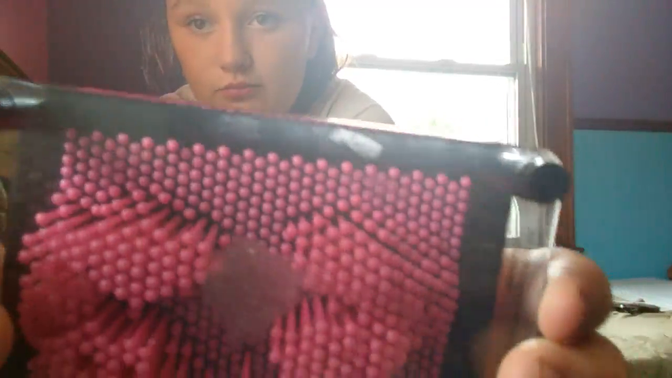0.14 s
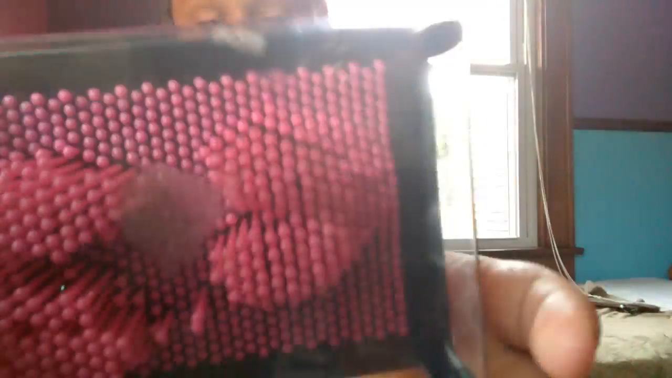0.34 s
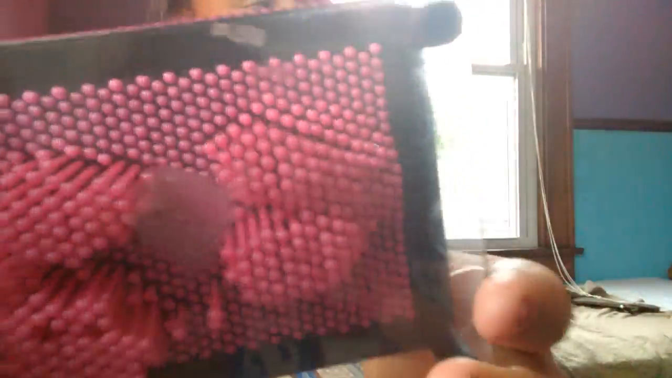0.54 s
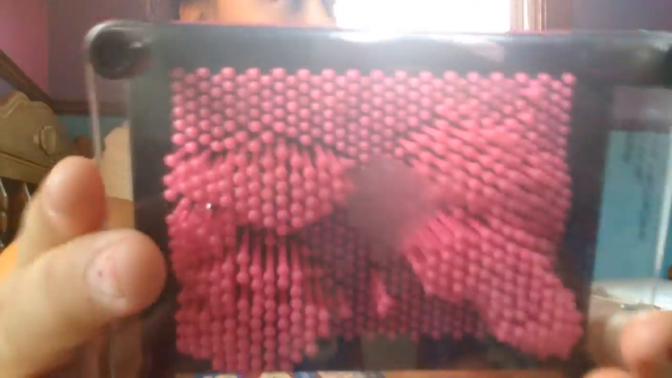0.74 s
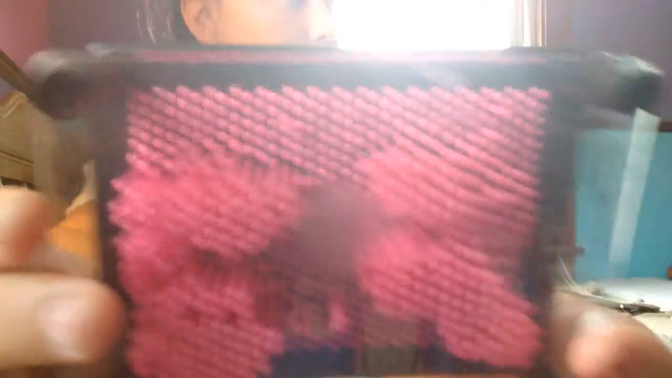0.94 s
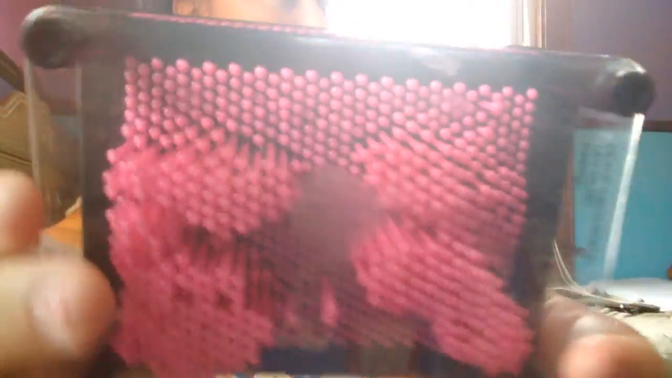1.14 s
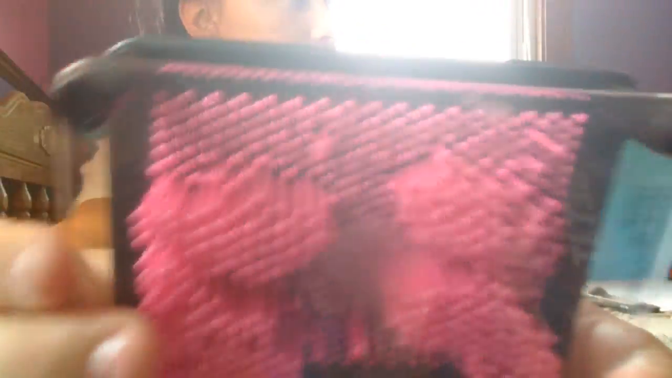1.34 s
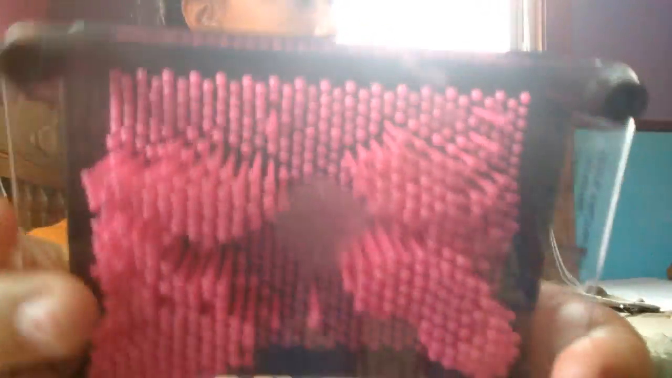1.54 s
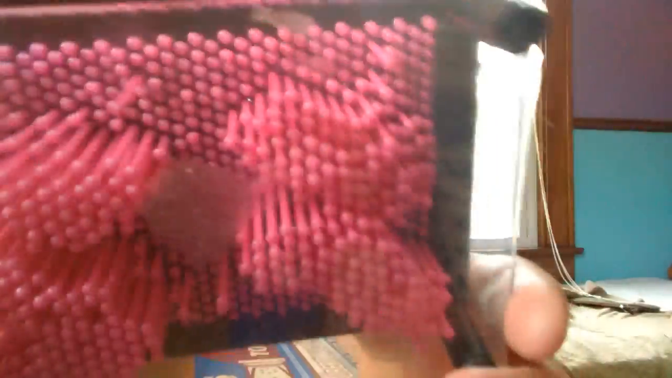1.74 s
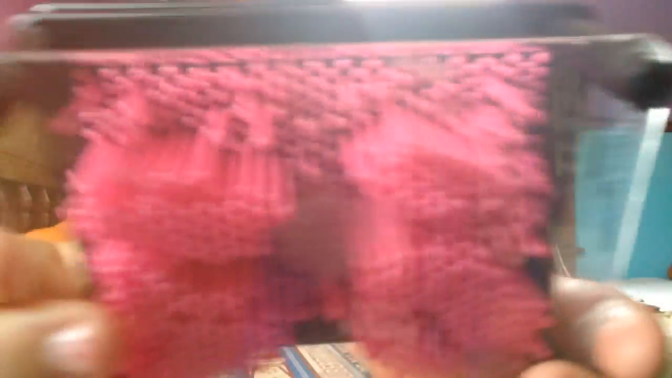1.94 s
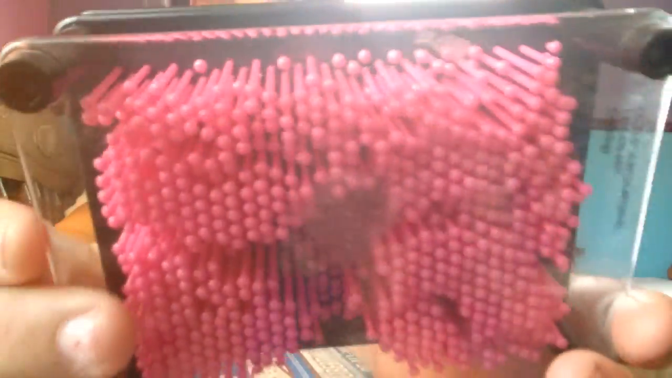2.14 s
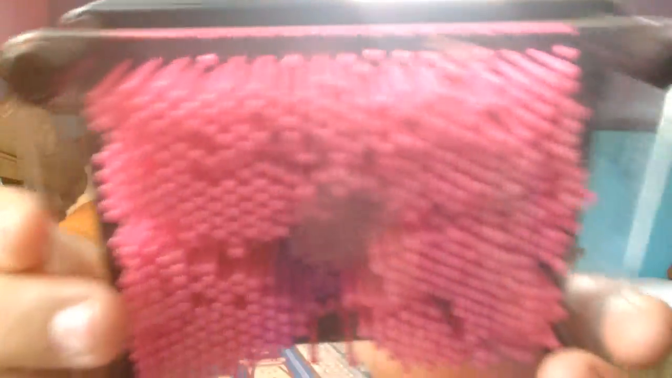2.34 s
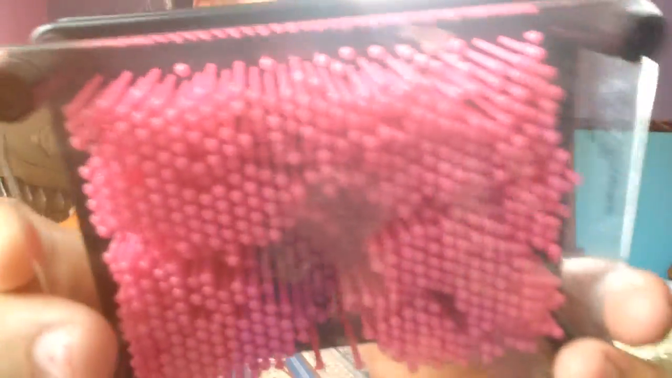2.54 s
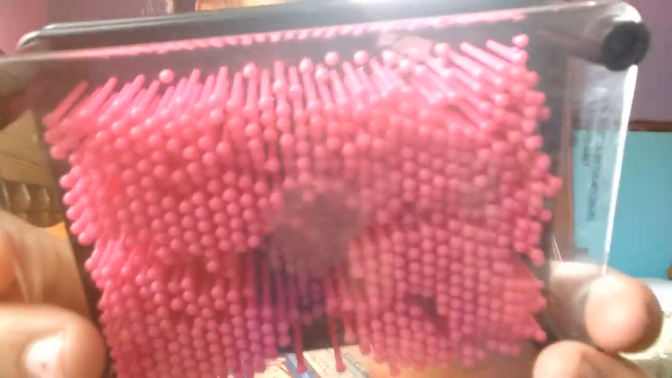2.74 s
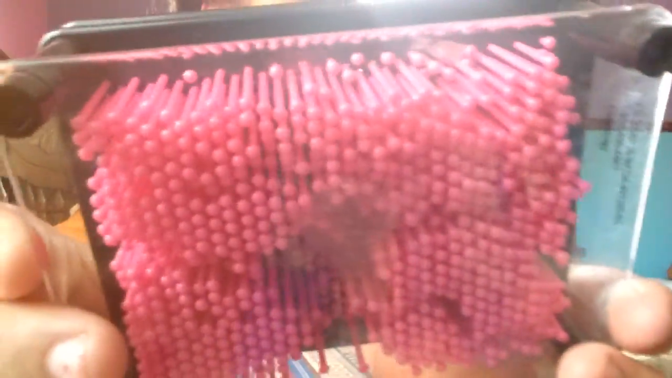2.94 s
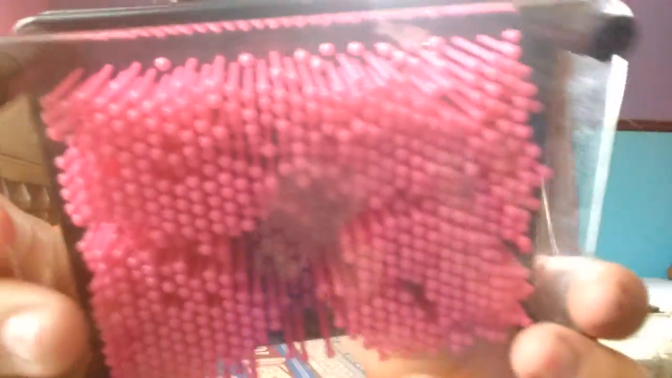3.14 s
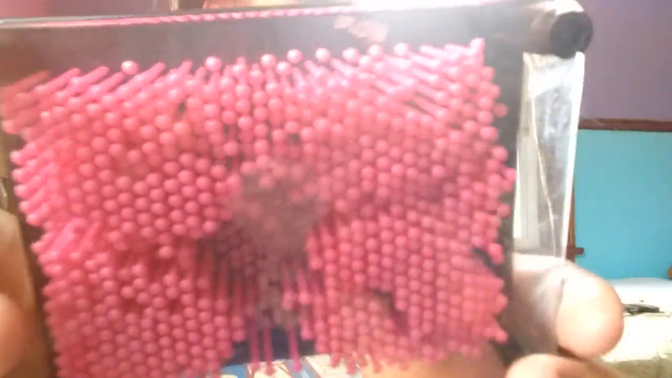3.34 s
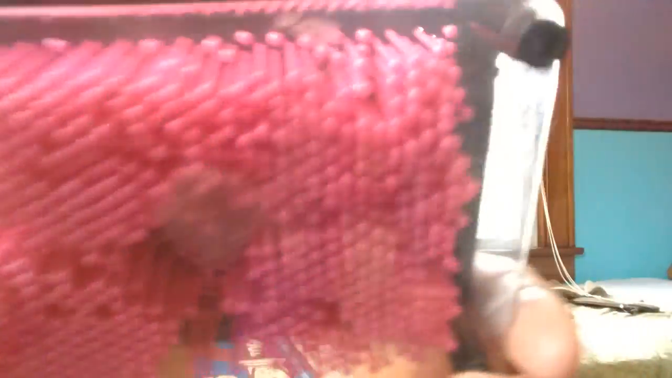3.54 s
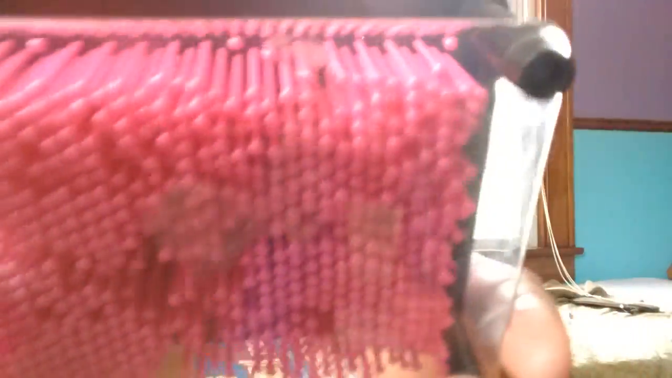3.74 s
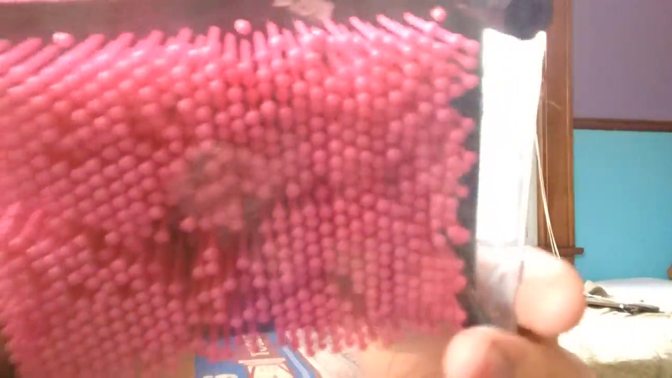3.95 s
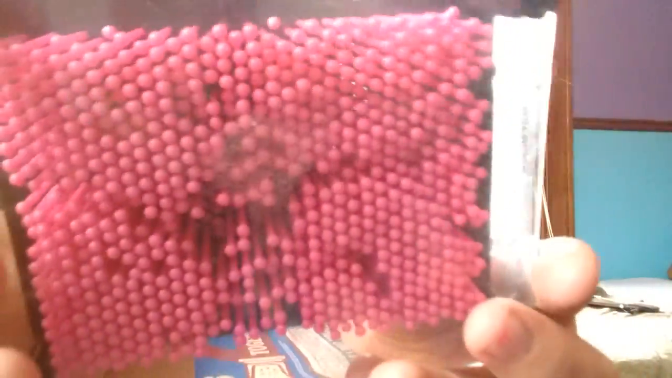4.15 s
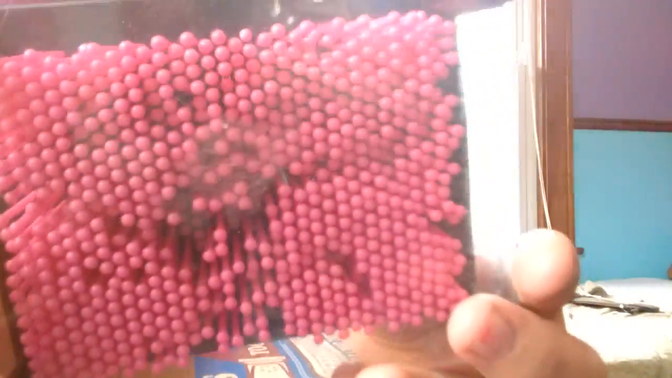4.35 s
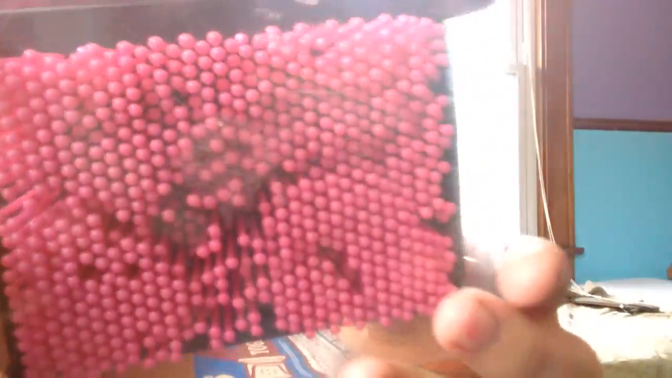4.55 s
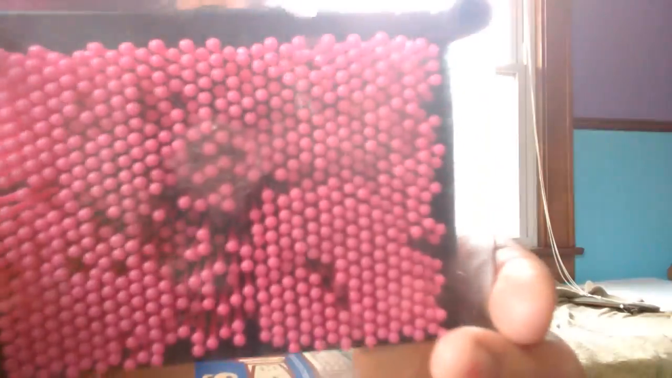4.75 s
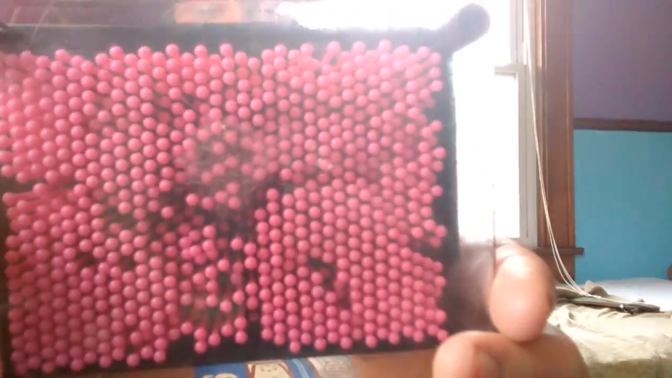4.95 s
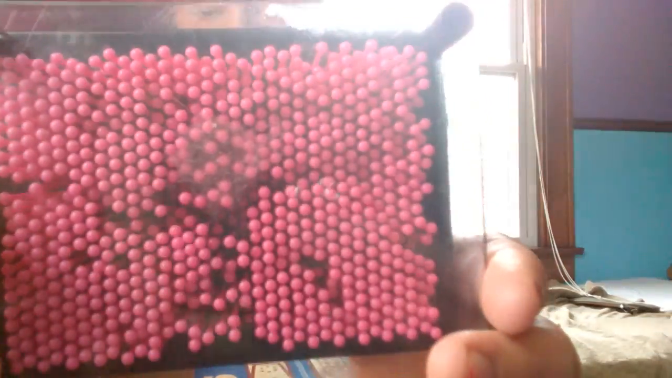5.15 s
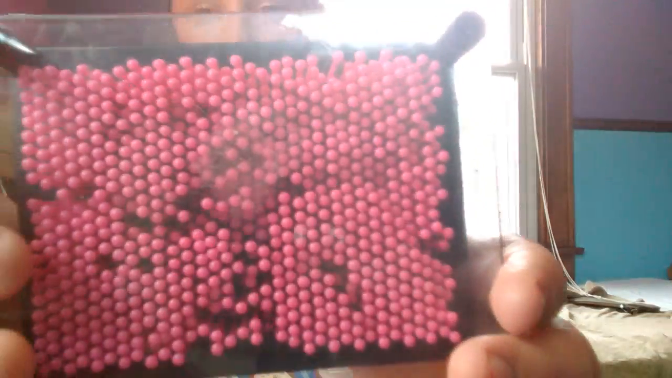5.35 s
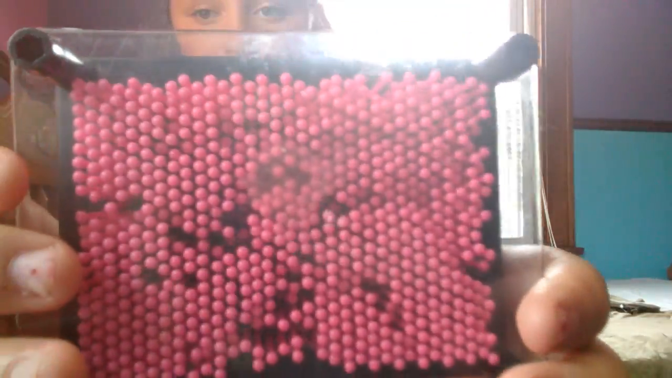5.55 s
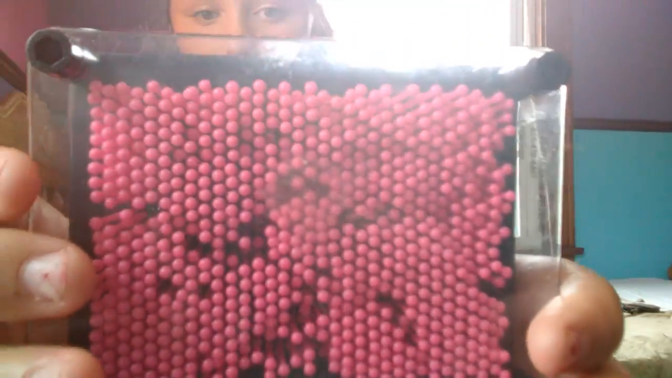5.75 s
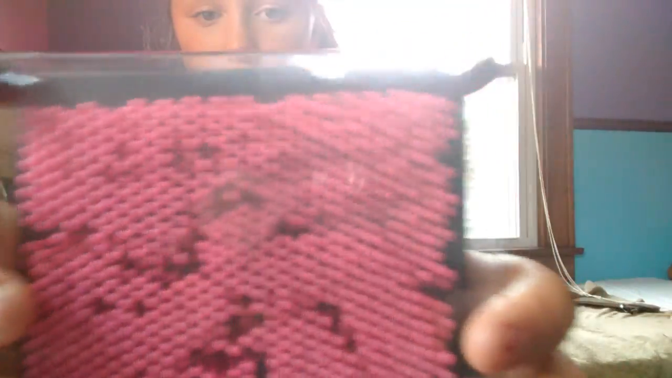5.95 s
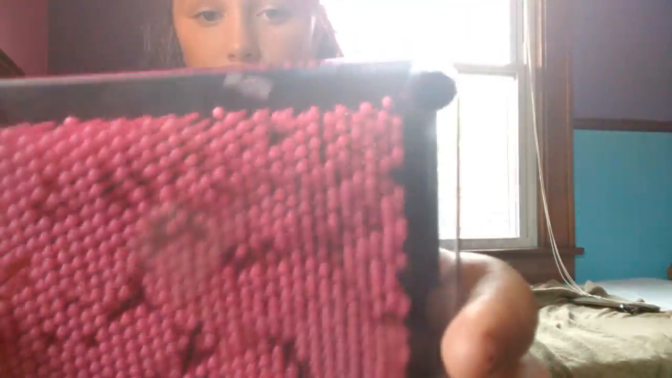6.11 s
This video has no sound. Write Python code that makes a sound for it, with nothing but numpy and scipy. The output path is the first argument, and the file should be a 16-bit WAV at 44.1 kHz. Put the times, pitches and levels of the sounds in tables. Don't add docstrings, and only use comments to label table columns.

```python
import sys
import numpy as np
from scipy import signal
from scipy.fft import rfft, irfft
from scipy.io import wavfile

SR = 44100
rng = np.random.default_rng(int(sys.argv[2]) if len(sys.argv) > 2 else 0)


def gain_from_db(level_db):
    decades = np.asarray(level_db, float) / 20
    return 10 ** decades


def persist_wave(psi):
    counts = np.round(np.clip(psi, -1, 1) * 32767).astype(np.int16)
    wavfile.write(sys.argv[1], SR, np.atleast_2d(counts).T)


N = 272538

# [t/s, tick level/dB, plate knock re tick/dB, length/ms]
CLUMPS = [(0.0107, -42, -20.5, 0.99), (1.669, -24, -14.5, 0.42), (1.857, -31.5, -9, 1.6),
          (1.902, -26, -10, 1.24), (2.381, -29, -6.5, 1.4), (2.4207, -19.5, -9.5, 1.7),
          (3.7715, -13.5, -14, 1.2), (4.219, -35, -11.5, 2), (4.2257, -33, -17.5, 0.79),
          (4.2374, -39.5, -17, 2.0), (4.243, -37.5, -18.5, 2.6), (5.1927, -44, -5, 4.3),
          (5.536, -34, -7, 3.5), (5.5507, -34.5, -11, 2.5), (5.7908, -38, -13, 2)]
# [t/s, tick level/dB, plate knock re tick/dB]
SINGLE_PINS = [(0.047, -12.5, -12.5), (1.0, -34.5, -4.5), (1.4322, -37.5, -9), (1.8986, -24.5, -13),
               (1.9269, -23, -14), (1.945, -10.5, -14), (1.9896, -9.5, -7.5), (2.414, -24, -8),
               (2.468, -10.5, -12), (2.8606, -19.5, -11.5), (2.892, -21.5, -9), (2.9179, -26, -9.5),
               (3.201, -32, -8.5), (3.2716, -33, -9.5), (3.747, -21, -9), (3.9329, -12, -8.5),
               (3.9518, -18, -7), (5.5738, -42, -8), (5.702, -38, -11)]
# [t/s, tick level/dB, plate knock re tick/dB]
JERK_LANDINGS = [(0.0649, -7.5, -10.5), (0.0673, -26.0, -6.5), (0.072, -10.5, -11.0), (0.0754, -0.5, -16),
                 (0.083, -2.5, -14), (0.092, -23.5, -12.5), (0.0957, -16.5, -16.5), (0.0987, -18.5, -13.5),
                 (0.103, -19.5, -17.5), (0.702, -11.5, -5), (0.7057, -0.5, -14.5), (0.7078, -0.5, -13.5),
                 (0.7108, -12.5, -8.5), (0.7143, -17, -17), (0.7159, -20.5, -17), (0.7188, -13.0, -17.0),
                 (0.7237, -16.5, -18), (0.728, -13.5, -16.5), (0.731, -17.5, -15.5), (0.7361, -21.0, -13.5),
                 (0.7398, -19.0, -13), (0.7438, -17.5, -10.5), (0.7463, -22.5, -11), (0.7522, -22, -14.5),
                 (0.7551, -24, -16.5), (0.7618, -22, -14), (0.7633, -26.5, -21.5), (0.7691, -24, -12),
                 (0.7718, -22, -23.5), (0.775, -30, -13.0), (1.4631, -19, -14.5), (1.465, -11.5, -9.5),
                 (1.469, -8.5, -17.5), (1.472, -17, -14.5), (1.475, -15, -11)]
# [t/s, tick level/dB, plate knock re tick/dB]
TIPPING_LANDINGS = [(1.9907, -9.5, -12), (1.9935, -5.5, -5), (1.9966, -1.5, -12.0), (2.002, -3.5, -11.5),
                    (2.0048, -15.5, -10), (2.007, -11.5, -11.5), (2.011, -12.0, -9), (2.0126, -8.0, -12.5),
                    (2.0172, -6, -15), (2.0206, -15.5, -11.5), (2.023, -13, -14.5), (2.0262, -15.5, -11),
                    (2.0283, -18, -16.5), (2.034, -28.5, -8.5), (2.0356, -5.5, -11), (2.0413, -2.0, -14.5),
                    (2.0451, -4, -16.0), (2.0485, -11, -12), (2.0546, -7.5, -13.0), (2.0563, -15, -16.5),
                    (2.063, -18.0, -15.0), (2.066, -8.5, -14.5), (2.0725, -6.5, -11),
                    (2.0818, -13.5, -12.5), (2.085, -12.5, -15), (2.094, -25.5, -16.5),
                    (2.0978, -27, -14.5), (2.101, -32.5, -9), (2.1045, -16.5, -13.0), (2.1086, -18.0, -6.5),
                    (2.1117, -7, -10), (2.1165, -22.0, -13), (2.1252, -5, -18), (2.13, -5.5, -17),
                    (2.1342, -2, -14), (2.1373, -5.5, -10.5), (2.1425, -4, -11), (2.1448, -7.5, -16),
                    (2.1481, -6.5, -12), (2.1514, -18.0, -10.5), (2.1557, -9.5, -10.5), (2.1612, -5, -8.5),
                    (2.1645, -14.5, -13), (2.1706, -14.5, -9), (2.176, -14, -10.5), (2.1794, -20.0, -14.5),
                    (2.1811, -19.5, -6), (2.1845, -19.5, -7.5)]
# [t/s, tick level/dB, plate knock re tick/dB]
SHAKE_LANDINGS = [(3.7813, -30, -21), (3.7842, -10.5, -10.5), (3.7866, -38, -27), (3.789, -23.0, -1),
                  (3.7929, -36, -16), (3.7955, -33, -8), (3.7975, -8.5, -14), (3.802, -12, -10.5),
                  (3.806, -25.5, -11.0), (3.807, -25.5, -11.5), (3.8124, -4.5, -15.5), (3.816, -24.5, -13),
                  (3.8175, -37, -6), (3.8225, -7, -12), (3.8275, -11, -9), (3.8318, -5, -15),
                  (3.8361, -5.5, -9), (3.837, -17, -6.5), (3.8417, -8, -12.5), (3.8453, -9.5, -9),
                  (3.8512, -11.5, -8), (3.8574, -7, -13), (3.8627, -21.0, -12), (3.8649, -14, -5.5),
                  (3.8714, -21, -19), (3.8746, -22.0, -16), (3.878, -31, -15), (3.8806, -30, -3.5),
                  (3.8838, -14, -7.5), (3.888, -19.5, -7), (3.8928, -12.5, -13.5), (3.8967, -27.0, -12.0),
                  (6.041, -39, -9.0), (6.0435, -12.5, -12), (6.0475, -13, -11.5), (6.0508, -8.5, -13.5),
                  (6.0526, -15, -15), (6.058, -30, -17), (6.061, -28, -25), (6.0649, -25, -27),
                  (6.0694, -25, -25), (6.072, -28, -23), (4.137, -30, -7), (4.14, -22, -4),
                  (4.142, -15, -9), (4.1449, -17.5, -10.5), (4.1494, -15, -12.5), (4.1515, -18.5, -14.5),
                  (4.1546, -22, -8)]
# [t/s, tick level/dB]
PIN_TAPS = [(0.193, -37), (0.2552, -40), (0.2753, -48), (0.326, -43), (.4244, -48), (0.4397, -49),
            (.524, -36), (0.8758, -42), (1.25, -49.5), (1.2972, -50), (1.412, -41.5), (1.642, -35),
            (1.6896, -33), (2.1963, -19), (2.5479, -37), (2.5818, -39.5), (2.804, -51.5), (3.3402, -44.5),
            (3.3617, -49), (3.3827, -49), (3.462, -52.5), (3.5428, -54.5), (4.4819, -53.5), (4.5587, -32),
            (4.7626, -48), (4.8684, -47), (5.7093, -35), (5.8, -35), (5.9566, -45), (6.106, -30.5)]
# [t/s, knock level/dB, brightness/(dB/octave)]
FRAME_CREAKS = [(.2887, -43, -4.5), (.339, -50, -3), (.3617, -52, -8.5), (.367, -47, -4), (.375, -57, -5),
                (0.462, -60, -9), (0.495, -53, -9), (0.515, -47.5, -7), (0.588, -43, -6), (.666, -53, -0.1),
                (1.394, -58, -8), (1.6072, -44, -1), (1.636, -41, 3), (1.648, -45, 0), (1.664, -50, 12),
                (2.2878, -37, 0), (2.3093, -37.5, 1.5), (2.3306, -32.5, -3), (2.4635, -26.5, -1.3),
                (3.66, -53.5, 3.5), (3.687, -54.5, -0.5), (3.694, -39.5, 3), (3.7034, -43, 9),
                (3.711, -41, 4), (3.9229, -22, 0.5), (4.0453, -33, 0.5), (4.204, -32.5, -2),
                (4.2605, -43, -2), (4.2667, -49, -1.5), (5.188, -49, -2.5), (5.268, -59.5, 3),
                (5.289, -62.5, 3.5), (5.317, -63, 1.5), (5.4868, -56.5, 2.5), (5.597, -55, -2.5),
                (5.6147, -47, -1), (5.638, -49, 4), (6.178, -45.5, 1.5)]
# [start t/s, length/s, first tick/dB, last tick/dB, plate knock re tick/dB]
PIN_CASCADES = [(0.107, 0.2, -37.5, -49.5, -10.5), (0.779, 0.081, -36, -50.5, -10),
                (1.475, 0.09, -29, -42, -12), (3.21, 0.043, -54, -71.5, -23), (4.158, 0.052, -46, -47, -17),
                (4.57, 0.017, -40, -46, -20), (4.698, 0.027, -57, -60, -25),
                (5.196, 0.099, -61.5, -71.5, -9.5), (5.553, 0.039, -48, -70, 0),
                (5.734, 0.017, -52, -58, -11), (5.783, 0.052, -44, -55, -21.5),
                (6.003, 0.042, -54, -57, -30), (6.074, 0.11, -30, -50, -17)]
# [t/s, peak level/dB]
TIP_BRUSHES = [(0.196, -45), (0.2523, -51), (0.275, -57), (0.297, -65), (0.3252, -58), (0.3324, -58),
               (0.424, -69), (0.4404, -69), (0.4818, -68), (0.4983, -66), (0.5237, -54), (0.5764, -56),
               (0.668, -45), (1.6834, -55), (1.6964, -59), (4.2194, -49.5), (4.2413, -49), (4.7142, -74),
               (4.7394, -63.5), (5.5069, -69), (5.6936, -60), (5.7284, -60), (5.7438, -64), (5.7983, -49),
               (5.824, -51), (6.0082, -57)]
# [t/s, peak level/dB, rise/s, fall/s, each for 20 dB]
BOARD_STIRS = [(.01, -44.5, .05, 0.17), (.12, -33.5, 0.061, 0.097), (.28, -51, 0.052, 0.06),
               (0.331, -67, .02, 0.085), (0.441, -57.5, .03, 0.033), (0.521, -50, 0.062, 0.035),
               (0.589, -56, .02, 0.012), (0.665, -37.5, 0.027, 0.11), (.695, -46.5, .03, 0.22),
               (1.27, -77.5, .08, 0.063), (1.581, -47.5, 0.11, 0.17), (1.67, -46, 0.054, 0.055),
               (1.92, -50, 0.07, 0.11), (2.07, -34.5, 0.12, 0.18), (2.44, -57, .1, 0.1),
               (2.9, -68.5, .04, 0.089), (3.35, -75.5, .15, .15), (3.719, -62.5, 0.05, 0.095),
               (3.85, -44.5, 0.095, 0.17), (4.131, -64, .03, 0.063), (4.23, -66.5, 0.057, 0.046),
               (4.56, -58.5, .04, 0.09), (4.719, -67.5, .05, 0.066), (4.87, -73, 0.023, .04),
               (5.2, -63, .01, 0.11), (5.468, -69, 0.1, 0.049), (5.56, -52, 0.037, 0.1),
               (5.741, -75, 0.052, 0.042), (5.81, -64, .03, 0.056), (5.969, -58.5, 0.046, 0.17)]
# [t/s, grip effort/dB, finger place/(dB/octave)]
HAND_GRIP = [(0.0, -65.5, -10), (.35, -66.5, 5), (.7, -72.5, 2), (1.05, -91.5, -3), (1.45, -91, 3),
             (1.65, -63.5, -11), (1.85, -81.5, -4), (2.1, -70, -3), (2.55, -73.5, -6), (2.8, -79.5, 4.5),
             (3.72, -80, -1.5), (3.9, -71, 3), (4.22, -75.5, -2), (5.15, -88, -4), (5.35, -76, 3),
             (5.75, -73, 4.5), (5.9, -81.5, 7), (6.18, -63, 5)]
# [f/Hz, level/dB, t60/s]
PLATE_MODES = [(372, -19.5, 0.0087), (726, -15.5, .012), (1063.3, -10.5, 0.0041), (1710.5, -9, .008),
               (2190, -4.5, 0.0052), (2830, -1.5, 0.0033), (3773, -5.5, 0.0043), (4550, -4.5, 0.0026),
               (5960, -2, 0.0014)]
# [f/Hz, level/dB, t60/s]
SHAFT_MODES = [(5600, -33, .012), (11000, -21, .013), (14300, -22, .005)]
# [f/Hz, level/dB, t60/s]
FRAME_MODES = [(1150, -14, .016), (1660, 0, .022), (1850, -4, .016), (2950, -1, .016), (3150, -5, .02)]
# [f/Hz, level/dB, t60/s]
RUB_MODES = [(352, -2.5, .011), (570, -3, .012), (830, -9, .008), (1250, -14, .005), (1760, -17, .004)]
# [f/Hz, level/dB, t60/s]
LOOSE_RUB_MODES = [(543, 2, 0.031), (1500, -13, .015)]
# [level/dB, start f/Hz, t60/s]
DESK_THUMP = (-33, 220, .1)
# [delay t/s, level/dB]
NEAR_ECHOES = [(.0019, -2), (.0038, -16), (.0092, -21), (0.0153, -16.5), (0.022, -19.5)]
# [f/Hz, t60/s]
ROOM_DECAY = [(150, 0.36), (500, 0.26), (1500, 0.41), (4000, 0.16), (8000, 0.24), (14000, 0.25)]
# [f/Hz, level/(dB per Hz)]
RUMBLE_SPECTRUM = [(30, -13.5), (60, -1), (120, 3), (250, -4), (500, -18.5), (1000, -31.5), (2000, -52.5)]
# [f/Hz, level/(dB per Hz)]
HISS_SPECTRUM = [(30, -3.5), (120, 3.5), (600, -7.5), (1400, -9.5), (4400, -22), (9000, -34.5),
                 (15000, -31.5)]
# [f/Hz, width/Hz, level/dB]
PORT_RESONANCES = [(7460, 1600, 15.5), (8197, 556, 34.5), (8260, 460, 17.5), (11300, 47, 3)]

LANDING_MS = 1.6
GRIP_EASES_S = 5.1


def clock():
    return np.arange(N) / SR


def at_hz(points, hz):
    table_hz, values = np.transpose(points)
    return np.interp(np.log(hz), np.log(table_hz), values)


def rms_one(x):
    return x / np.sqrt(np.mean(x ** 2) + 1e-20)


def held_noise(length):
    return np.repeat(rng.standard_normal(N // length + 1), length)[:N]


def train(times_s, sizes):
    at = np.clip((times_s * SR).astype(int), 0, N - 1)
    return np.bincount(at.ravel(), sizes.ravel(), N)


def ring(clicks, hz, t60):
    r, w = gain_from_db(-60 / (t60 * SR)), 2 * np.pi * hz / SR
    return signal.lfilter([0, np.sin(w)], [1, -2 * r * np.cos(w), r * r], clicks + 1e-18)


def ring_modes(clicks, modes):
    return sum(gain_from_db(db) * ring(clicks, hz, t60) for hz, db, t60 in modes)


def tick(clicks, cut_hz, soft_hz):
    sos = signal.butter(2, [cut_hz, soft_hz], "band", fs=SR, output="sos")
    return signal.sosfilt(sos, clicks + 1e-18)


def strikes(heads_per_ms, tick_db, knock_db, scatter_db, count):
    s, level_db, plate_db, length_ms, tilt_db = np.transpose(contacts())[:, :, None]
    order, chance = np.arange(count), rng.random((len(s), count))
    times = s + (order + (order > 0) * (chance - .5)) / heads_per_ms / 1000
    landed = np.clip(0.71 + length_ms * heads_per_ms - order, order == 0, 1)
    crowded = length_ms == LANDING_MS
    landed = landed * np.where(crowded & (order == 0), 0.79, 1)
    sizes = landed * gain_from_db(level_db + rng.normal(0, 1, times.shape)) * rng.choice([-1, 1], times.shape)

    hard = np.clip((level_db + 62) / 82, .15, 1) * np.clip(-plate_db / 4.6, .2, 1)
    octaves = np.log2(np.transpose(PLATE_MODES)[0] / 2500)[:, None, None]
    scatter = scatter_db * rng.normal(0, 1, (len(PLATE_MODES), *times.shape))
    colour = gain_from_db(plate_db + (tilt_db - 2.8 * (1 - hard)) * octaves + scatter)

    delays, echo_db = np.transpose(NEAR_ECHOES)
    lags = delays * (1 + .05 * rng.normal(0, 1, (len(s), len(delays))))
    rebound = times + lags[:, :1]
    plate = knock([train(times, sizes * c) + gain_from_db(-11.5) * train(rebound, sizes * c) for c in colour], 0.73)
    plate += frame(times, sizes * gain_from_db(plate_db - 12 * hard))

    sharp, gentle = train(times, sizes * hard), train(times, sizes * (1 - hard))
    screened = sizes * gain_from_db(-7 * crowded)
    gentle += train(times[:, :, None] + lags[:, None], screened[:, :, None] * gain_from_db(echo_db))
    ticks = tick(sharp, 5000, 13000) + shafts(sharp) + tick(gentle, 6000, 9600)
    return gain_from_db(tick_db) * ticks + gain_from_db(knock_db) * plate


def contacts():
    tap_knock_db, creak_tick_db = -21, -2.5
    early_s, landing_db = 0.00065, -2
    landings = JERK_LANDINGS + TIPPING_LANDINGS + SHAKE_LANDINGS
    rows = [(*row, 0) for row in CLUMPS]
    rows += [(*row, .3, 0) for row in SINGLE_PINS]
    rows += [(s - early_s, db + landing_db, knock_db, LANDING_MS, 0) for s, db, knock_db in landings]
    rows += [(s, db, tap_knock_db, .5, 0) for s, db in PIN_TAPS]
    rows += [(s, db + creak_tick_db + tilt, -creak_tick_db - tilt, .3, tilt) for s, db, tilt in FRAME_CREAKS]
    return rows + cascades()


def cascades():
    gap_s, clump_ms = 0.0041, 1.2
    start, length, first_db, last_db, plate_db = np.transpose(PIN_CASCADES)[:, :, None]
    gap, clump = rng.random((2, len(start), 40))
    since = (np.cumsum(.4 + 1.2 * gap, axis=1) - .4) * gap_s
    level_db = first_db + (last_db - first_db) * since / length
    level_db = np.where(since < length, level_db, -200)
    columns = start + since, level_db, plate_db, clump_ms * 2 * clump, 0
    return np.transpose([np.broadcast_to(c, since.shape).ravel() for c in columns]).tolist()


def knock(trains, longer):
    plate = 0
    for k, ((hz, db, t60), clicks) in enumerate(zip(PLATE_MODES, trains)):
        plate = plate + (-1) ** k * gain_from_db(db) * ring(clicks, hz, longer * min(t60, .015))
    return plate


def frame(times, sizes):
    held_db, free_db = -26, -5
    clicks = train(times, sizes * gain_from_db(np.where(times < GRIP_EASES_S, held_db, free_db)))
    return ring_modes(clicks, FRAME_MODES)


def shafts(clicks):
    held_db = -9
    free = np.interp(clock(), [1.85, 1.85, 3.3, 3.3], gain_from_db([held_db, 0, 0, held_db]))
    return ring_modes(clicks * free, SHAFT_MODES)


def glints(gain_db, spread_ms, count):
    s, db = np.transpose(TIP_BRUSHES)[:, :, None]
    when, size = rng.random((2, len(s), count))
    clicks = train(s + when * spread_ms / 1000, gain_from_db(db + gain_db) * (2 * size - 1))
    return tick(clicks, 9500, 19000)


def chatter(tick_db, knock_db, top_db, per_s, uneven_db, clump_db):
    born = rng.random(N) < per_s * gain_from_db(clump_db * held_noise(600)) / SR
    sizes = gain_from_db(uneven_db * np.minimum(rng.exponential(1, N), 4))
    clicks = born * sizes * rng.choice([-1, 1], N)
    ticks = gain_from_db(tick_db - 26.5) * rms_one(tick(clicks, 6000, 11000))
    plate = gain_from_db(knock_db - 12) * rms_one(knock([clicks] * len(PLATE_MODES), 0.49))
    top = gain_from_db(top_db) * rms_one(tick(clicks, 11000, 17000))
    return ticks + plate + top


def tremble():
    still_db = -89
    s, db, rise, fall = np.transpose(BOARD_STIRS)[:, :, None]
    t = np.arange(0, N, 64) / SR
    away = np.maximum((s - t) / np.maximum(rise, .004), (t - s) / np.maximum(fall, .004))
    swells = gain_from_db(db - 20 * away)
    return np.interp(clock(), t, 20 * np.log10(swells.sum(axis=0) + gain_from_db(still_db)))


def rub(rub_db, tilt_db):
    grip_slip = gain_from_db(3 * held_noise(400))
    noise = rng.standard_normal((len(RUB_MODES), N)) * grip_slip
    modes = [gain_from_db(db) * ring(n, hz, t60) for (hz, db, t60), n in zip(RUB_MODES, noise)]
    scale = np.std(sum(modes))
    touched = sum(m * gain_from_db(tilt_db * np.log2(hz / 600)) for m, (hz, _, _) in zip(modes, RUB_MODES))
    eased = np.clip((clock() - GRIP_EASES_S) / .15, 0, 1)
    loose = sum(gain_from_db(db - 9) * ring(n, hz, t60) for (hz, db, t60), n in zip(LOOSE_RUB_MODES, noise[2:]))
    return gain_from_db(rub_db) / scale * eased * loose + gain_from_db(rub_db - 0.5) / scale * touched


def thump():
    db, hz, t60 = DESK_THUMP
    t = np.maximum(clock() - .704, 0)
    turns = hz * .006 * (1 - np.exp(-t / .006)) + 48 * t
    return -gain_from_db(db - 60 * t / t60) * np.sin(2 * np.pi * turns)


def room(x, wet_db, onset_s, count):
    t = np.arange(SR // 2) / SR
    edges = np.append(100 * 2 ** np.arange(0, 8.), .45 * SR)
    tails = np.zeros((count, len(t)))
    for low, high in zip(edges[:-1], edges[1:]):
        decay = gain_from_db(-60 * t / at_hz(ROOM_DECAY, np.sqrt(low * high)))
        tails += tick(rng.standard_normal(tails.shape), low, high) * decay
    tails *= gain_from_db(wet_db) * (1 - np.exp(-(t / onset_s) ** 2))
    place = np.arange(N) // 2000 % count
    return x + sum(signal.fftconvolve(x * (place == k), tail)[:N] for k, tail in enumerate(tails))


def coloured(spectrum):
    hz = np.maximum(np.fft.rfftfreq(N, 1 / SR), 1)
    return rms_one(irfft(rfft(rng.standard_normal(N)) * gain_from_db(at_hz(spectrum, hz)), N))


def rumble_and_hiss(swing_db):
    rumble = gain_from_db(-75 + 0.54 * swing_db) * coloured(RUMBLE_SPECTRUM)
    hiss = gain_from_db(-90 + 0.1 * swing_db) * coloured(HISS_SPECTRUM)
    return rumble + hiss


def scene():
    shake_db = tremble()
    grip_s, effort_points, tilt_points = np.transpose(HAND_GRIP)
    effort_db = np.interp(clock(), grip_s, effort_points)
    tilt_db = np.interp(clock(), grip_s, tilt_points)

    swing_db = shake_db + 65
    plate_db = -76 + 0.89 * swing_db
    top_db = shake_db + 0.35 * swing_db - 39.5
    pins = strikes(1.6, -9.5, -5.5, scatter_db=2.5, count=14)
    pins += glints(3.6, 4.5, count=7)
    pins += chatter(shake_db, plate_db, top_db, per_s=1400, uneven_db=2.7, clump_db=4)
    pins = tick(pins, 220, 19000)

    floor = rub(effort_db, tilt_db) + thump() + rumble_and_hiss(effort_db + 78)
    return (room(pins, -40, 0.0018, count=7) + floor)[None]


def top_cut(x):
    return signal.sosfilt(signal.butter(12, 16950, fs=SR, output="sos"), x)


def record(dry):
    x = dry.copy()
    for hz, width, db in PORT_RESONANCES:
        r = np.exp(-np.pi * width / SR)
        poles = [1, -2 * r * np.cos(2 * np.pi * hz / SR), r * r]
        x += gain_from_db(db) * signal.lfilter((1 - r * r) / 2 * np.array([1, 0, -1]), poles, dry)
    x = .75 * np.tanh(x / .75)
    x = signal.sosfilt(signal.butter(2, 45, "high", fs=SR, output="sos"), x)
    x = signal.sosfilt(signal.ellip(8, 1, 23, 15800, fs=SR, output="sos"), x)
    x = signal.sosfilt(signal.cheby2(10, 50, 17200, fs=SR, output="sos"), x)
    return top_cut(x - .0005)


dry = scene()
out = record(dry)
persist_wave(out)
```